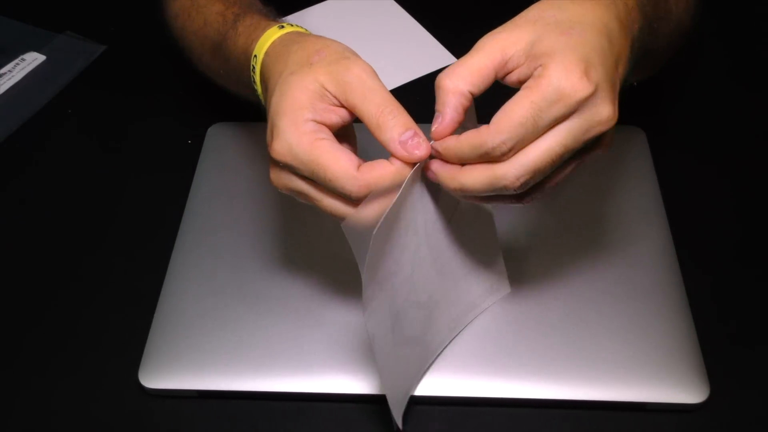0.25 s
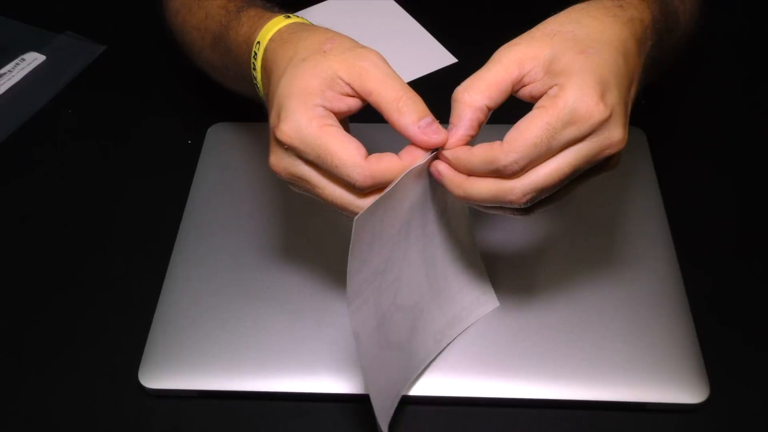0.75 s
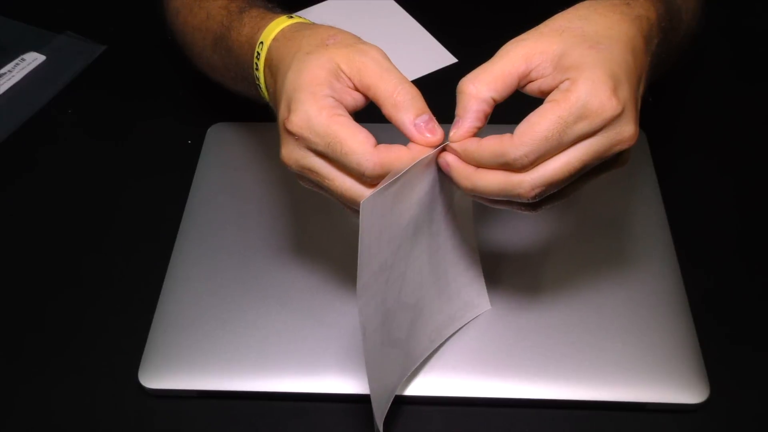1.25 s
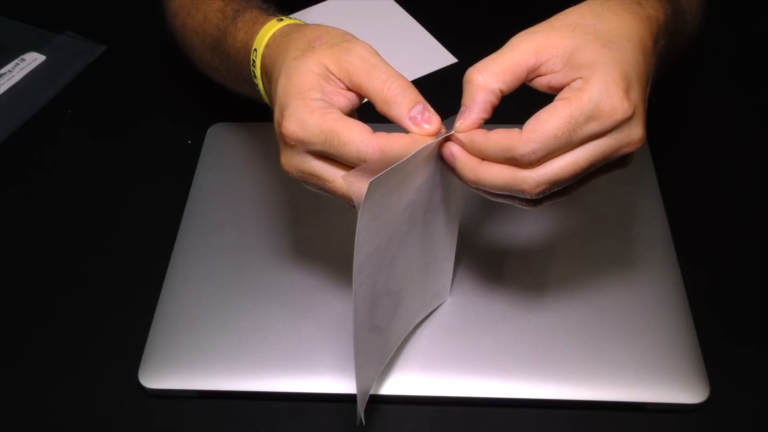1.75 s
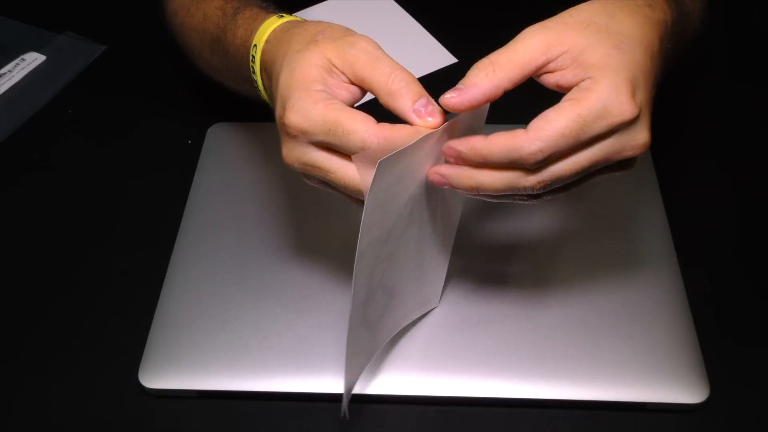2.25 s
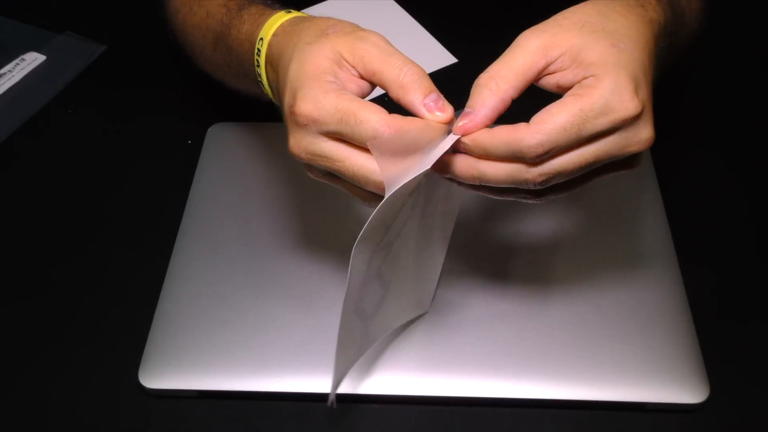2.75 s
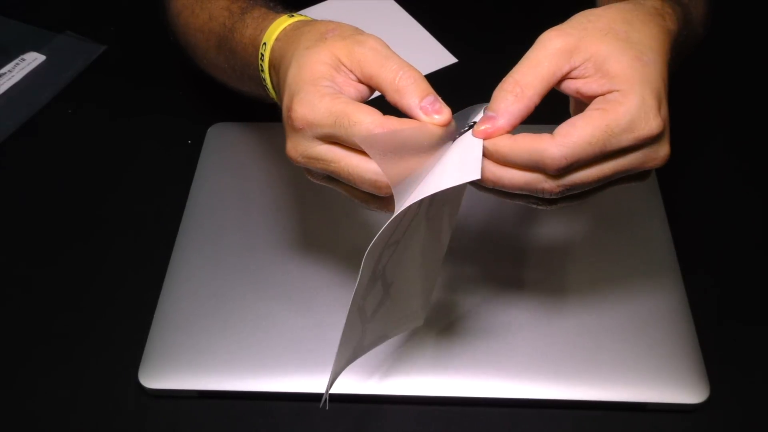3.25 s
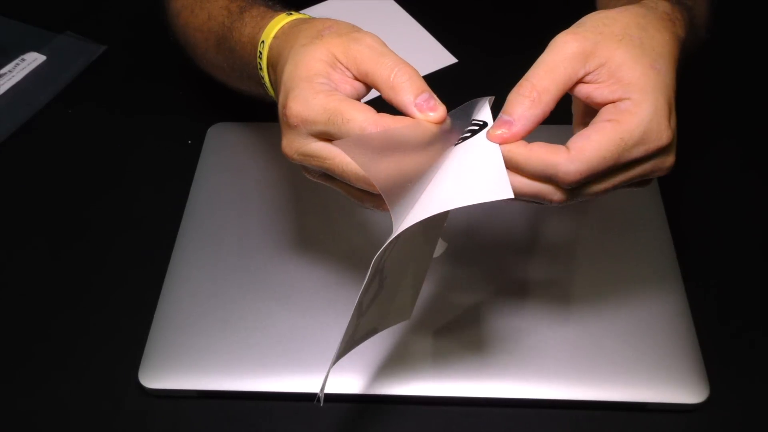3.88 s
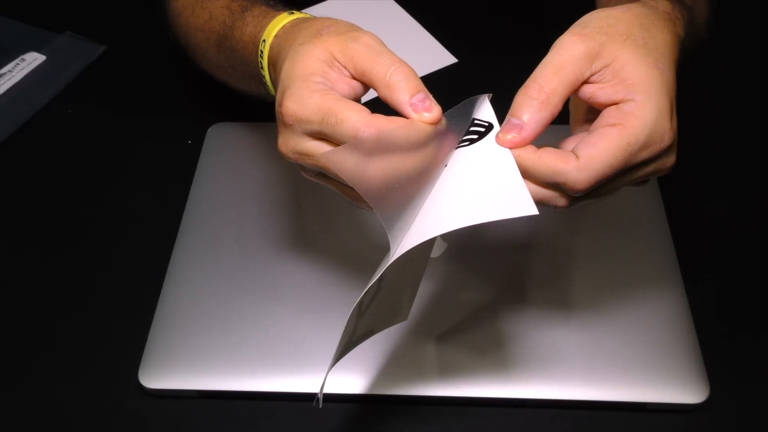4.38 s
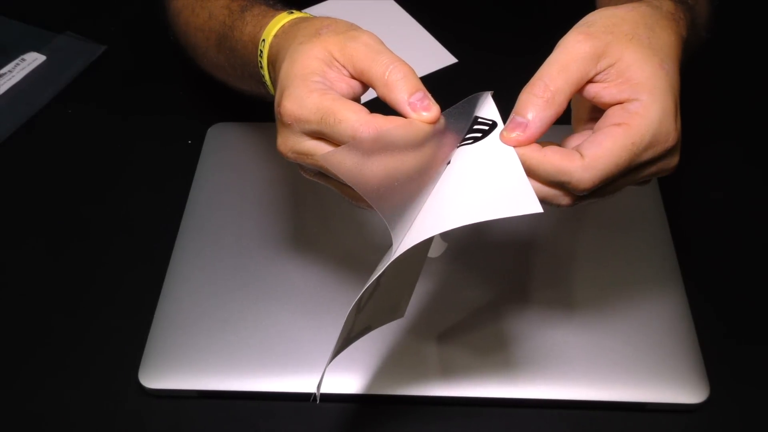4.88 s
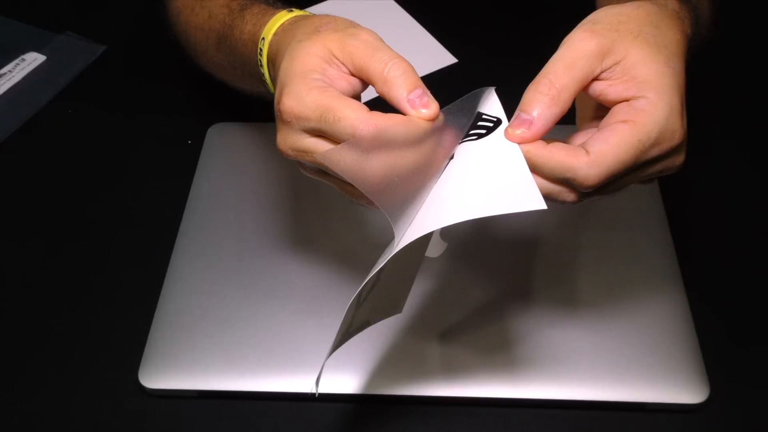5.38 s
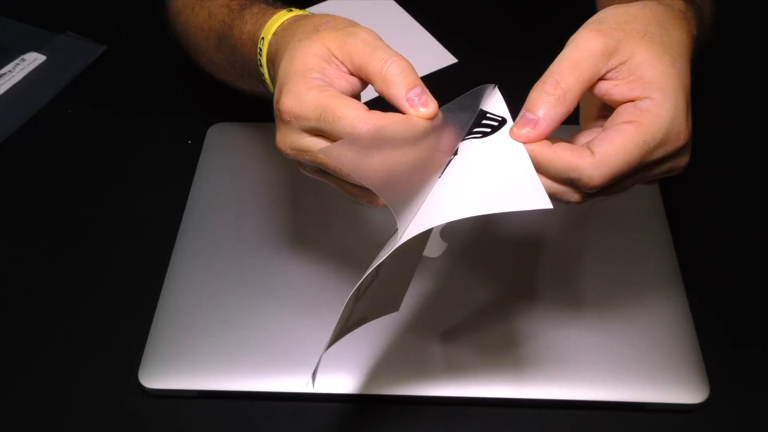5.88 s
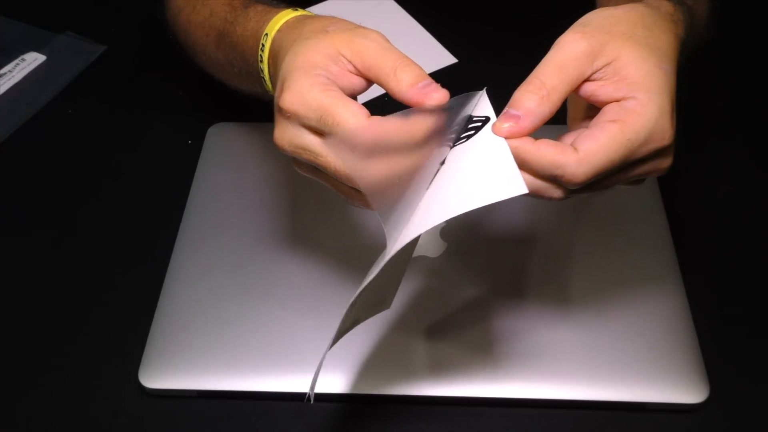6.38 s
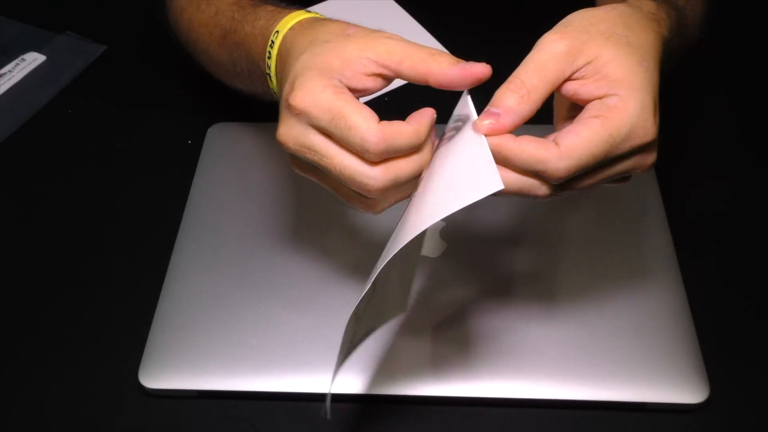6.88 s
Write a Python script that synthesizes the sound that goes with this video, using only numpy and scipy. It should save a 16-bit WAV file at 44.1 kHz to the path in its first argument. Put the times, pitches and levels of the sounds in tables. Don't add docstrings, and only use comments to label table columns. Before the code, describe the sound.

A quiet, close indoor scene with hands handling a stiff adhesive sheet over a hard surface. It opens with a short papery scrape and light rustle up to about 0.3 s. Small nail clicks follow at 0.36 and 0.53 s, then more around 1.1 to 1.6 s, with a clearer snap at 1.43 s. Very soft skin slides fill the lull around 2 s. At 2.67 s a bright snap starts the peeling; another strong one comes at 3.04 s, then irregular tiny crackles, clustering thickly near 4.1 s and snapping again at 4.5 s. From 4.6 s only sparse faint ticks remain, with a snap at 5.94 s. The backing bends at 6.2 s, cracks loudest and duller at 6.31 s, and clicks sharply at 6.58 s, ending in faint rustle at 7 s. Low uneven rumble, faint wavering motor hum and soft hiss run throughout.

```python
import sys
import numpy as np
from scipy import signal
from scipy.fft import rfft, irfft
from scipy.io import wavfile

SR = 44100
rng = np.random.default_rng(int(sys.argv[2]) if len(sys.argv) > 2 else 0)


def store_pcm(level_fs):
    pcm = np.round(np.clip(level_fs, -1, 1) * 32767).astype(np.int16)
    wavfile.write(sys.argv[1], SR, np.atleast_2d(pcm).T)


def invert_db(x):
    u = np.asarray(x, float) / 20
    return 10 ** u


N = 313551

# (time [s], peak [dB], pitch [Hz], ring [Hz])
PICKS = [(0.3586, -34, 9000, 7050), (0.3614, -30.5, 5200, 4500), (0.5317, -39.5, 10300, 2100),
         (1.1524, -34.5, 6200, 5600), (1.2332, -37.5, 6000, 4900), (1.3817, -33.5, 7500, 4300),
         (1.4205, -46, 4500, 4100), (1.5011, -44, 8000, 2400), (1.6363, -41.5, 8600, 5340),
         (6.516, -51, 6000, 1600), (6.567, -52, 6495, 5310), (6.5726, -46, 6000, 4960),
         (6.5757, -30, 4430, 6310), (6.5776, -25, 7360, 2900), (6.941, -45.5, 3900, 5305)]
# (time [s], peak [dB], pitch [Hz], ring [Hz])
PEELS = [(2.6721, -20, 6600, 7150), (2.8363, -33.5, 7100, 6200), (2.9419, -30.5, 7200, 7500),
         (3.0358, -21.5, 6900, 4850), (3.1324, -37.5, 6900, 9600), (3.1832, -33.5, 7000, 4700),
         (3.232, -38, 6660, 8700), (3.3008, -32.5, 7560, 4500), (3.409, -29, 6800, 3640),
         (3.5582, -27.5, 7700, 4900), (3.708, -28.5, 10200, 4060), (3.7917, -37, 8700, 11000),
         (3.9606, -31.5, 9800, 6910), (4.0154, -33.5, 9400, 11000), (4.1155, -31, 7600, 6800),
         (4.128, -30, 10000, 4700), (4.146, -31, 8800, 4100), (4.1533, -35, 8000, 3900),
         (4.1827, -38, 10100, 6900), (4.2876, -34.5, 7900, 8340), (4.5087, -24, 9800, 3082),
         (4.5241, -29, 8400, 6700), (5.6379, -35.5, 6730, 3200), (6.0237, -37, 8300, 6540),
         (6.1224, -40.5, 8000, 6740)]
# (time [s], peak [dB])
GLUE_THREADS = [(3.0699, -50), (3.088, -42), (3.1755, -40), (3.4605, -38.5), (3.5925, -41), (3.6236, -45),
                (3.652, -41.5), (3.739, -44.5), (3.7527, -49), (3.9202, -53), (3.9464, -49), (4.0063, -55),
                (4.023, -48), (4.0346, -48), (4.0818, -53), (4.0956, -47), (4.104, -42), (4.1114, -45),
                (4.1289, -34), (4.1373, -39), (4.159, -52), (4.2205, -46), (4.249, -48), (4.6066, -42),
                (4.8116, -48), (5.1218, -49), (5.2767, -40.5), (5.6113, -53), (5.797, -49.5)]
# (time [s], peak [dB], pitch [Hz], ring [Hz], ring level [dB])
RINGING_BREAKS = [
    (1.4346, -26, 5200, 5000, -5),
    (4.15, -22.5, 7100, 3800, -11),
    (4.0984, -29, 11000, 6940, -10),
    (5.936, -32, 7800, 3500, -10),
    (3.8875, -27, 9200, 6800, -16),
    (1.073, -30, 10600, 5800, -12),
]
# (time [s], peak [dB], pitch [Hz], ring [Hz], ring level [dB])
BUCKLES = [
    (1.2898, -55, 2700, 2300, -3),
    (1.582, -58, 3000, 1300, -10),
    (6.2146, -30, 2300, 3200, -24),
    (6.3117, -16.5, 2700, 2330, -9),
    (6.3634, -39, 1970, 1160, -2.5),
    (6.366, -40, 1990, 1600, -4),
    (6.3684, -43, 2200, 1500, -10),
]
# (start [s], length [s], level [dB], centre [Hz])
RIPS = [
    (0.357, 0.0054, -51, 6500),
    (1.4317, 0.0025, -43.5, 6060),
    (4.1284, 0.0013, -37, 7000),
    (6.573, 0.0028, -49, 5500),
    (6.5769, 0.0015, -35, 6000),
]
# (time [s], peak [dB], pitch [Hz])
JOLTS = [(1.4352, -37, 600), (1.437, -35.5, 1900), (1.968, -47.5, 650), (2.6724, -49.5, 1300),
         (3.036, -44, 1760), (3.4091, -59, 1800), (2.6722, -45, 2600), (3.5583, -49, 2200),
         (3.8876, -46, 2300), (4.5088, -47, 2300), (3.708, -48.5, 1620), (3.8873, -51, 1610),
         (4.509, -51, 1400), (6.2147, -54, 710), (6.5776, -44.5, 1000), (6.5774, -35, 2500),
         (6.3117, -30.5, 757)]
# (start [s], length [s], scrape [dB], brightness [dB per region])
RUBS = [(-.012, 0.027, -43.5, 0), (-.01, .024, -56, -10), (0.018, 0.084, -48.5, 3.5),
        (0.081, 0.045, -63, -2.5), (0.132, 0.065, -59, -2), (0.207, 0.12, -69.5, -3.2),
        (0.27, 0.085, -66, -1), (0.354, 0.063, -61, -5.5), (0.405, 0.063, -74, -4), (0.526, 0.061, -67, -5),
        (0.746, 0.038, -72.5, -9), (0.817, 0.063, -70.5, -9), (1.073, 0.036, -72, -4.5),
        (1.138, 0.11, -71.5, -6.5), (1.257, 0.088, -72.5, -9), (1.348, 0.12, -71.5, -7.5),
        (1.42, 0.073, -64, -4), (1.482, 0.063, -72, -9.5), (1.552, 0.1, -69, -5),
        (1.635, 0.079, -82, -13.5), (1.956, 0.037, -72.5, -9), (6.28, 0.027, -66, 2.5),
        (6.315, 0.039, -69, -10), (6.354, .024, -65, -12), (6.462, 0.048, -72.5, 3.5),
        (6.542, 0.042, -66.5, 2), (6.607, 0.019, -77, -12), (6.932, 0.1, -73, 2), (7.044, 0.065, -70.5, 2)]
# (start [s], length [s], level [dB])
SLIDES = [
    (1.575, .06, -70),
    (1.989, 0.19, -63.5),
    (2.252, 0.036, -68.5),
    (2.357, .04, -79),
    (2.546, 0.072, -73.5),
    (4.72, 0.14, -81),
    (4.965, 0.084, -78),
    (6.146, 0.1, -73),
    (6.43, 0.04, -67),
]
# (start [s], length [s], level [dB])
CREEPS = [
    (2.67, .27, -73.5),
    (3.03, 0.35, -78.5),
    (3.55, 0.43, -80.5),
    (3.92, 0.2, -73.5),
    (4.17, .2, -77),
]
RUB_EDGES_HZ = [450, 1800, 4800, 11300, 16000]
SLIDE_COLOUR_DB = [-16, -11, 0, -6]
CREEP_COLOUR_DB = [-19, -1, 0, -9]
# (time [s], lag [ms])
LID_LAG = [(0, 0.32), (1.0, 0.33), (2.0, 0.29), (3.0, 0.257), (7.11, 0.28)]
# (time [s], deep level [dB], upper level [dB])
BUMPS = [(0, -36, -41.5), (.17, -49, -48), (.31, -34, -44), (.385, -32, -45), (.49, -39.5, -50),
         (.62, -42.5, -51.5), (.85, -44, -67), (1.33, -40.5, -52.5), (1.6, -42, -54), (1.8, -41.5, -55),
         (2.03, -40.5, -52), (2.24, -42.5, -60), (2.49, -52, -49.5), (2.69, -43.5, -49),
         (2.79, -37.5, -54.5), (2.95, -40.5, -53), (3.19, -40, -67), (3.96, -50, -56.5), (4.08, -57, -49.5),
         (4.3, -41, -48), (4.45, -46.5, -50), (4.97, -47, -48.5), (5.2, -42, -50), (5.47, -52, -47),
         (5.6, -43.5, -52), (5.72, -41, -52.5), (5.84, -58, -45.5), (6.65, -44, -49), (6.92, -37.5, -49),
         (7.08, -41, -45.5)]
# (frequency [Hz], level [dB per Hz])
DEEP_COLOUR = [(12, -36), (20, 5), (32, -5.5), (45, -5), (60, -28), (100, -76)]
# (frequency [Hz], level [dB per Hz])
UPPER_COLOUR = [(30, -50), (45, 1), (55, -1), (80, -5), (120, -14.5), (170, -22.5), (300, -92)]
# (time [s], level [dB])
MOTOR_LEVEL = [(0, -68), (.75, -87), (1.03, -65), (1.64, -83), (1.78, -70), (2.39, -71.5), (2.47, -61.5),
               (3.0, -85), (3.15, -72), (3.68, -77), (3.8, -65.5), (4.08, -62.5), (4.41, -68.5),
               (4.75, -57.5), (5.19, -72), (5.4, -60), (6.3, -61.5), (7.11, -63.5)]
# (multiple of its pitch, level [dB])
MOTOR_ORDERS = [(1.0, 0), (1.487, -10), (2.0, -13), (2.5, -20)]
# (frequency [Hz], level [dB per Hz])
AIR_COLOUR = [(59, -33), (100, -9), (193, -4.5), (243, -3), (413, -10), (450, -14.5), (645, -19.5),
              (944, -19.5), (1240, -24.5), (2450, -27.5), (7060, -29), (14500, -31), (15800, -26.5)]
# (frequency [Hz], level [dB per Hz])
SIDE_COLOUR = [(12, -30), (20, -9), (30, -1.5), (205, -41), (1890, -39.5), (14200, -37), (16400, -50)]


def snaps():
    thread_hz, thread_ring_hz, scatter_octaves = 8400, 5600, .2
    pick_ring_db, glue_ring_db = -12, -18
    scatter = 2 ** (scatter_octaves * rng.standard_normal((len(GLUE_THREADS), 2)) * [1, 2])
    threads = np.c_[GLUE_THREADS, [thread_hz, thread_ring_hz] * scatter]

    rows = []
    for table, ring_db in [(PICKS, pick_ring_db), (PEELS, glue_ring_db), (threads, glue_ring_db)]:
        for s, db, hz, ring_hz in table:
            rows.append((s, db, hz, edge_level(hz), ring_hz, ring_db - 0.42 * (db + 38)))
    rows += [(s, db, hz, edge_level(hz), *ring) for s, db, hz, *ring in RINGING_BREAKS]
    rows += [(s + rng.uniform(.05, .25) / 1000, db - 8, *rest) for s, db, *rest in rows]

    glue = breaks(rows, cycles=0.32, lean=0.31, ring_cycles=3.0, flutter_db=0.0, flutter_ms=2.4)
    no_lows = signal.butter(3, 2700, "high", fs=SR, output="sos")
    glue = 0.018 * glue + signal.sosfilt(no_lows, glue)

    buckle_edge_db = -40
    buckle_rows = [(s, db, hz, buckle_edge_db, *ring) for s, db, hz, *ring in BUCKLES]
    buckles = breaks(buckle_rows, cycles=0.32, lean=-.85, ring_cycles=2.3, flutter_db=-7, flutter_ms=4.4)
    return glue + buckles


def edge_level(hz):
    return -10 + 9 * np.log2(hz / 7500)


def breaks(rows, cycles, lean, ring_cycles, flutter_db, flutter_ms):
    out = np.zeros(N + 400)
    t = np.arange(-40, 360) / SR
    after = np.maximum(t, 0)
    noises = rng.standard_normal((len(rows), 400))
    for (s, peak_db, hz, edge_db, ring_hz, ring_db), noise in zip(rows, noises):
        pulse = np.sin(2 * np.pi * hz * t + lean) * np.exp(-.5 * (t * hz / cycles) ** 2)
        pulse[39:41] += invert_db(edge_db) * np.array([-1, 1])
        ring = np.sin(2 * np.pi * ring_hz * after) * np.exp(-after * ring_hz / ring_cycles)
        fading_noise = noise * np.exp(-after * 1000 / flutter_ms) * (t > 0)
        flutter = band(fading_noise, .68 * ring_hz, 1.14 * ring_hz)
        at = round(s * SR) - 40
        out[at:at + 400] += invert_db(peak_db) * (pulse + invert_db(ring_db) * (ring + invert_db(flutter_db) * flutter))
    return out[:N]


def rips(width_octaves):
    out = np.zeros(N)
    for (s, length, db, hz), noise in zip(RIPS, rng.standard_normal((len(RIPS), 600))):
        swell = np.sin(np.pi * np.clip(np.arange(600) / SR / length, 0, 1)) ** .5
        burst = band(noise * swell, hz / 2 ** width_octaves, hz * 2 ** width_octaves)
        at = round(s * SR)
        out[at:at + 600] += invert_db(db) * burst * 1.45
    return out


def jolts(cycles):
    out, t = np.zeros(N), np.arange(600) / SR
    for s, peak_db, hz in JOLTS:
        at = round((s - .25 / hz) * SR)
        out[at:at + 600] -= invert_db(peak_db) * np.sin(2 * np.pi * hz * t) * np.exp(-t * hz / cycles)
    return band(out, 460, 7500)


def rubs(grains_per_s, spread_db, patchy_db):
    sheet_hz, sheet_db = 577, 0.5
    lid_db, table_db = -6, -24
    t, power = np.arange(N) / SR, np.zeros((4, N))
    for start, length, *levels_db in strokes():
        span = slice(max(round(start * SR), 0), round((start + length) * SR))
        swell = np.clip(np.sin(np.pi * (t[span] - start) / length), 0, 1) ** 0.91
        power[:, span] += invert_db(2 * np.array(levels_db))[:, None] * swell

    caught = rng.random((4, N)) < grains_per_s / SR
    strength = invert_db(spread_db * np.minimum(rng.exponential(1, (4, N)), 4))
    grains = caught * strength * rng.choice([-1, 1], (4, N))
    regions = [rms_one(band(g, low, high)) for g, low, high in zip(grains, RUB_EDGES_HZ, RUB_EDGES_HZ[1:])]
    drum = band(regions[0], 0.864 * sheet_hz, 1.17 * sheet_hz)
    regions[0] = regions[0] + invert_db(sheet_db) * drum
    regions[2] = mirrors(regions[2], lid_db, table_db)
    regions[3] = mirrors(regions[3], lid_db, table_db)
    return sum(invert_db(patchy_db * drift(90)) * np.sqrt(p) * r for p, r in zip(power, regions))


def strokes():
    hump_db, top_db = 3.5, -21
    rows = []
    for s, length, db, tilt in RUBS:
        rows.append((s, length, db - tilt - hump_db, db, db + tilt - hump_db, db + tilt + top_db))
    rows += [(s, length, *np.add(db, SLIDE_COLOUR_DB)) for s, length, db in SLIDES]
    return rows + [(s, length, *np.add(db, CREEP_COLOUR_DB)) for s, length, db in CREEPS]


def mirrors(x, lid_db, table_db):
    table_lag_ms = .9
    now, lag = np.arange(N), in_time(LID_LAG)[0] * SR / 1000
    off_lid = np.interp(now - lag, now, x)
    bounced_again = np.interp(now - 2 * lag, now, x)
    off_table = np.interp(now - table_lag_ms * SR / 1000, now, x)
    return x + invert_db(lid_db) * off_lid + invert_db(2 * lid_db) * bounced_again + invert_db(table_db) * off_table


def room(x):
    fade_s, level_db, wall_cut_hz = 0.2, -22, 8300
    t = np.arange(SR // 2) / SR
    tail = rng.standard_normal((2, len(t))) * invert_db(-60 * t / fade_s) * (t > .004)
    tail = band(1.3 * tail[0] + 0.15 * tail, 400, wall_cut_hz)
    tail /= np.sqrt(np.sum(tail ** 2) / 2)
    return invert_db(level_db) * signal.fftconvolve(x[None], tail, axes=1)[:, :N]


def rumble():
    deep_bed_db, upper_bed_db, bump_width_s = -50, -59, 0.039
    s, *levels_db = np.transpose(BUMPS)
    t = np.arange(0, N, 100) / SR
    power = invert_db(2 * np.array(levels_db)) @ np.exp(-((t - s[:, None]) / bump_width_s) ** 2)
    power += invert_db(2 * np.array([[deep_bed_db], [upper_bed_db]]))
    deep, upper = (np.interp(np.arange(N) / SR, t, np.sqrt(p)) for p in power)
    return deep * coloured(DEEP_COLOUR) + upper * coloured(UPPER_COLOUR)


def motor(waver_db):
    motor_hz = 164.3
    level_db, = in_time(MOTOR_LEVEL)
    phase = 2 * np.pi * motor_hz * np.arange(N) / SR
    hum = np.zeros(N)
    for k, db in MOTOR_ORDERS:
        loudness = invert_db(level_db + db + waver_db * k * drift(3.4))
        hum += loudness * np.sqrt(2) * np.sin(k * phase + k * k)
    return hum


def air():
    return invert_db(-62) * coloured(AIR_COLOUR)


def side_hiss():
    return invert_db(-70) * coloured(SIDE_COLOUR) * [[1], [-1]]


def coloured(spectrum):
    hz, level_db = np.transpose(spectrum)
    grid = np.log(np.arange(1, N // 2 + 2) * SR / N)
    shape = invert_db(np.interp(grid, np.log(hz), level_db))
    return rms_one(irfft(rfft(rng.standard_normal(N)) * shape, N))


def drift(rate):
    knots = rng.standard_normal(1000)
    return np.interp(np.arange(N) / SR * rate, np.arange(1000), knots)


def band(x, low_hz, high_hz):
    sos = signal.butter(2, [low_hz, min(high_hz, .45 * SR)], "band", fs=SR, output="sos")
    return signal.sosfilt(sos, x)


def rms_one(x):
    return x / np.sqrt(np.mean(x ** 2) + 1e-20)


def in_time(rows):
    s, *columns = np.transpose(rows)
    return [np.interp(np.arange(N) / SR, s, c) for c in columns]


def scene():
    lid_db, table_db = -17, -19
    sharp = mirrors(snaps() + rips(width_octaves=1.0), lid_db, table_db)
    hands = sharp + jolts(cycles=0.91) + rubs(5000, spread_db=2.5, patchy_db=2.2)
    centre = hands + rumble() + motor(waver_db=1.3) + air()
    return centre * invert_db([[.05], [-.05]]) + room(hands) + side_hiss()


def top_cut(x):
    return signal.sosfilt(signal.butter(12, 16520, fs=SR, output="sos"), x)


def record(dry):
    cutoff_hz = 16600
    low_pass = signal.cheby2(12, 60, cutoff_hz, fs=SR, output="sos")
    mix = signal.sosfilt(low_pass, dry)
    return top_cut(mix)


dry = scene()
out = record(dry)
store_pcm(out)
```